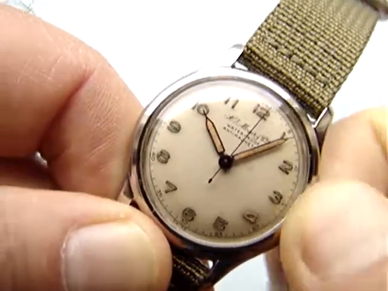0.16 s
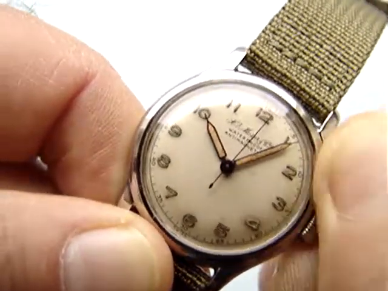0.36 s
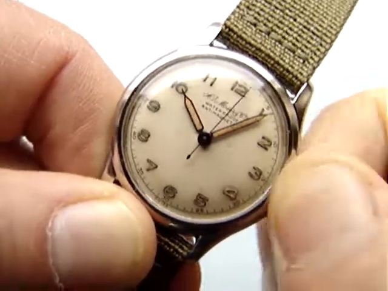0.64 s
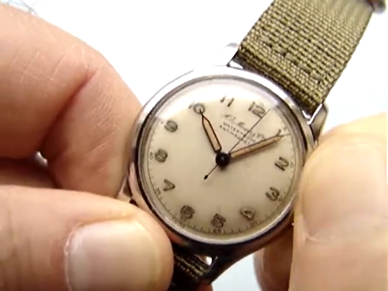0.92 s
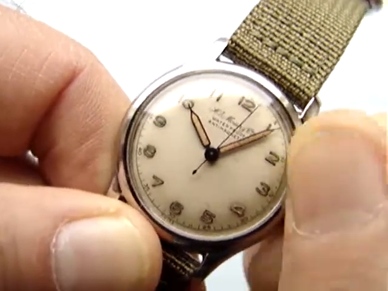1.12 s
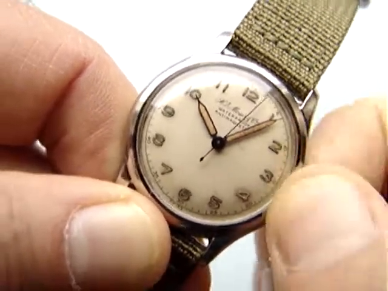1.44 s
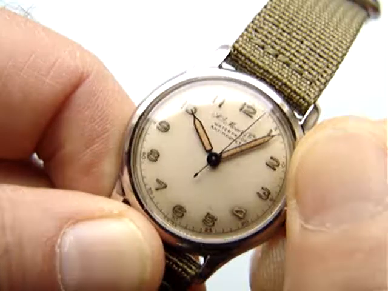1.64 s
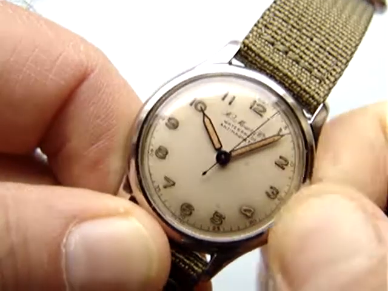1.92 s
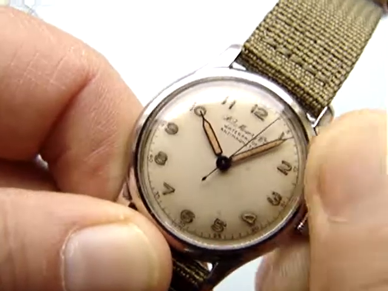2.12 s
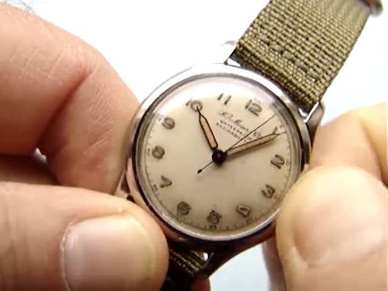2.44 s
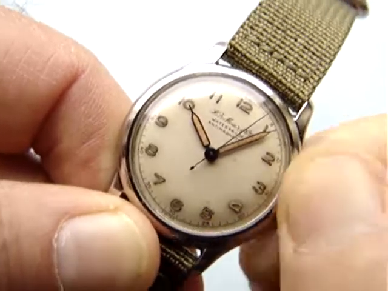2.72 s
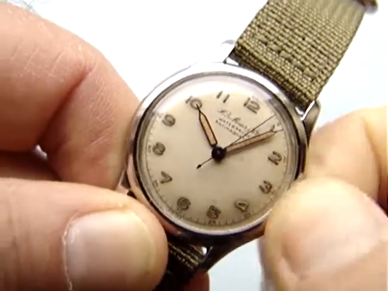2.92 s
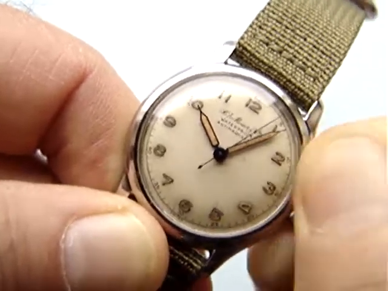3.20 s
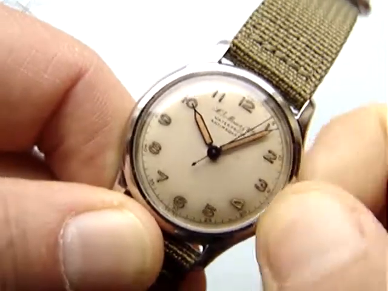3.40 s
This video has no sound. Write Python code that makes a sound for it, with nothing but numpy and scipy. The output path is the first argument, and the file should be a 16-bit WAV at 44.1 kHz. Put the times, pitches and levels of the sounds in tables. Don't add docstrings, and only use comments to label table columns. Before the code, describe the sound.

A wristwatch crown is wound back and forth by fingertips, giving short bursts of dry metallic ratchet clicks, alternating fuller and thinner, with skin rubs and soft bumps, close to a small microphone in a quietly hissing room.

```python
import sys
import numpy as np
from scipy import signal
from scipy.fft import rfft, irfft, next_fast_len
from scipy.io import wavfile

SR = 44100
rng = np.random.default_rng(int(sys.argv[2]) if len(sys.argv) > 2 else 0)


def to_wav(sig):
    pcm = np.clip(np.atleast_2d(sig), -1, 1) * 32767
    pcm = np.round(pcm).astype(np.int16)
    wavfile.write(sys.argv[1], SR, pcm.T)


def magnitude_from_level(level_db):
    exponent = np.asarray(level_db, float) / 20
    return 10 ** exponent


N = 156996
SLIDE_S, LEAD_S = 0.003, 0.0004
REBOUND_DB = -14


def unit(x):
    return x / np.sqrt(np.mean(x ** 2) + 1e-20)


def along(points, hz):
    f, db = np.transpose(points)
    return np.interp(np.log(hz + 1), np.log(f + 1), db, left=-120, right=-120)


def curves(rows):
    s, *columns = np.transpose(rows)
    return [np.interp(np.arange(N) / SR, s, column) for column in columns]


def noise(gain):
    m = next_fast_len(N)
    spectrum = rfft(rng.standard_normal(m)) * gain(np.fft.rfftfreq(m, 1 / SR))
    return unit(irfft(spectrum, m)[:N])


def coloured(points):
    return noise(lambda f: magnitude_from_level(along(points, f)))


def narrow(hz, width_hz):
    return noise(lambda f: 1 / (1 + (2 * (f - hz) / width_hz) ** 2))


def add(out, s, sound):
    out[round(s * SR):][:len(sound)] += sound


# (frequency [Hz], level [dB])
RUMBLE = [(26, -47), (50, -8.5), (78, -13), (100, -6), (154, -3.5), (273, -6), (595, -7), (660, -8.5),
          (1500, -13.5), (1950, -19), (3300, -120)]
# (frequency [Hz], width [Hz], level [dB])
DRONE = [(54.6, 9, -88), (131.7, 11, -73), (171, 16, -70), (225, 10, -73)]
# (time [s], level [dB])
SWELL = [
    (0, -2.5),
    (1.5, -3.5),
    (2.9, 1.5),
    (3.56, 6),
]


def room_hum():
    swell = magnitude_from_level(curves(SWELL)[0] + 0.3 * noise(lambda f: f < 8))
    rumble = magnitude_from_level(-60.5) * coloured(RUMBLE)
    hum = sum(magnitude_from_level(db) * narrow(hz, width) * swell for hz, width, db in DRONE)
    whine_hz = 6414
    whine = magnitude_from_level(-74.5) * np.sqrt(2) * np.sin(2 * np.pi * whine_hz * np.arange(N) / SR)
    return rumble + hum + whine


# (time [s], level [dB], pitch [Hz])
PASSING = [
    (1.75, -68, 261.5),
    (1.95, -62, 340.4),
    (2.2, -59.5, 422),
    (2.45, -62.5, 405),
    (2.75, -66.5, 331.4),
    (3.0, -101, 292),
]


def far_vehicle():
    db, hz = curves(PASSING)
    width_hz = 234
    turn = 2 * np.pi * np.cumsum(hz) / SR
    return magnitude_from_level(db) * (narrow(0, width_hz) * np.cos(turn) + narrow(0, width_hz) * np.sin(turn))


# (frequency [Hz], level [dB])
HISS = [(880, -27), (1500, -8), (2320, -2.5), (2420, -1), (2720, -4), (3510, -4.5), (3830, -5.5),
        (6210, -9), (10000, -7.5), (13000, -57), (22000, -120)]


def room_hiss():
    return magnitude_from_level(-61) * coloured(HISS)


def rubbing(strokes, colour):
    t = np.arange(N) / SR
    press = np.zeros(N)
    for s, length, db in strokes:
        arch = np.sin(np.pi * np.clip((t - s) / length, 0, 1))
        press += magnitude_from_level(db) * np.sqrt(np.clip(arch, 0, 1))
    grain = magnitude_from_level(2 * noise(lambda f: f < 300))
    return press * unit(grain * coloured(colour))


# (start [s], length [s], level [dB])
BURSTS = [
    (0, 0.027, -59.5),
    (0.394, 0.04, -55),
    (0.519, 0.031, -51.5),
    (1.215, 0.045, -58.5),
    (1.803, 0.057, -56),
    (2.299, 0.025, -52.5),
    (2.805, .04, -54),
    (3.162, 0.037, -60),
    (3.273, 0.043, -55),
    (0.685, 0.011, -64.5),
]
# (frequency [Hz], level [dB])
BURST_COLOUR = [(1800, -28), (2800, 0), (3600, -21.5), (6500, -18), (8800, -2.5), (10000, -10)]


def grainy_bursts():
    return rubbing(BURSTS, BURST_COLOUR)


def ring(modes, t):
    hz, db, t60 = np.transpose(modes)[..., None]
    louder, sharper, shifted = rng.standard_normal((3, len(modes), 1))
    sign = np.where(hz > 8000, 1, (-1.) ** np.arange(len(modes))[:, None])
    fade = magnitude_from_level(db + 1.5 * louder - 60 * t / t60)
    waves = sign * fade * np.sin(2 * np.pi * hz * (1 + 0.008 * sharper) * t + 0.35 * shifted)
    attack_s = 0.0002
    return waves.sum(axis=0) * (1 - np.exp(-(t / attack_s) ** 2))


# (frequency [Hz], level [dB], 60 dB fade [s])
CASE = [(2730, 0, .0095), (2930, -3, .008), (2300, -9.5, .008), (3230, -10, .007)]


def click(parts, case_db, rebound_db):
    t = np.arange(SR // 40) / SR - SLIDE_S
    rebound_s = 0.0021 * (1 + 0.05 * rng.standard_normal())
    now, later = np.maximum(t, 0), np.maximum(t - rebound_s, 0)
    scrape = magnitude_from_level(-20) * np.exp(t / 0.001)
    rattle_fade = magnitude_from_level(-18.5 - 60 * now / 0.01)
    shake = np.where(t < 0, scrape, rattle_fade)
    out = magnitude_from_level(case_db) * unit(ring(CASE, now))
    for steel, db in parts:
        blow = ring(steel, now)
        rattle = shake * unit(np.convolve(rng.standard_normal(len(t)), blow, "same"))
        rebound = magnitude_from_level(rebound_db) * ring(steel, later)
        out = out + magnitude_from_level(db) * unit(blow + rattle + rebound)
    return out


# (frequency [Hz], level [dB], 60 dB fade [s])
PAWL = [(8470, 0, 0.0036), (8770, 3, 0.0067), (9140, -6, 0.0066), (9200, 0, 0.0065), (10100, -8.5, 0.0076)]
STEM = [(5720, -17.5, 0.0035), (6387, -7.5, 0.0043), (6670, -13.5, 0.0089), (7190, -9, 0.0066),
        (8110, -9.5, 0.0045)]
# (time [s], case level [dB], steel level [dB])
TICKS = [(0.027, -69, -61.5), (0.2391, -60, -81), (0.41, -63, -63), (0.533, -51.5, -59.5),
         (0.907, -65, -73), (1.253, -64, -60), (1.534, -69, -74), (1.84, -62.5, -61.5), (2.038, -61.5, -67),
         (2.305, -74, -58), (2.326, -67, -54), (2.543, -60, -62), (2.831, -57.5, -58), (2.994, -67, -75),
         (3.295, -73, -59), (3.386, -63, -62)]


def slack_ticks():
    out = np.zeros(N + SR)
    for s, case_db, steel_db in TICKS:
        add(out, s - SLIDE_S, click([(STEM[1:] + PAWL, steel_db)], case_db, REBOUND_DB))
    return out[:N]


# (frequency [Hz], level [dB], 60 dB fade [s])
WHEEL = [(3636, -18, .007), (3940, -9.5, 0.01), (4213, -6, 0.0095), (4560, -7, 0.0096), (5154, -7, 0.0068),
         (5490, -15.5, 0.0045)]
# (time [s], pawl level [dB], then relative to it: stem [dB], wheel [dB], case [dB])
WINDING = [(0.059, -52.3, -4.8, -2.8, -2.6), (0.0757, -47.4, -9.8, -7.8, -7.6),
           (0.0935, -48.4, -4.9, -11.8, -5.9), (0.1151, -57.0, -1.3, 1.6, -4.6),
           (0.1524, -56.4, 1.4, 0.3, -2.1), (0.5744, -48.1, -5.7, -8.5, -4.8),
           (0.614, -49.3, -8.6, -10.0, -5.2), (0.644, -49.2, -9.5, -11.0, -13.1),
           (0.6753, -49.7, -5.0, -8.6, -2.2), (0.7587, -50.6, -6.1, -10.0, -7.4),
           (1.2862, -49.0, -9.9, -10.9, -10.7), (1.3043, -51.2, -8.5, -5.7, -1.7),
           (1.3279, -50.2, -9.1, -7.6, -3.3), (1.364, -52.4, -4.3, -2.1, -2.2),
           (1.4042, -51.5, 1.6, -5.7, -5.4), (1.8763, -48.3, -4.0, -9.5, -6.1),
           (1.8959, -50.3, -4.7, -7.0, -2.9), (1.9146, -49.2, -3.8, -7.8, -3.4),
           (1.9403, -50.2, -3.1, -5.2, -4.5), (2.36, -48.9, -4.9, -8.6, -1.6),
           (2.3809, -51.3, -5.1, -2.0, 0.3), (2.3997, -52.0, -2.4, -3.0, -3.0),
           (2.4195, -50.2, -2.4, -4.1, -3.4), (2.8555, -48.0, -9.6, -5.9, -1.6),
           (2.8686, -45.9, -7.2, -10.4, -9.5), (2.8821, -46.7, -6.4, -5.7, -8.6),
           (2.8979, -56.2, -0.2, 4.7, 4.0), (2.9204, -46.4, -8.9, -11.0, -14.3),
           (3.3379, -45.1, -7.7, -9.3, -7.6), (3.3744, -51.3, -1.9, -2.6, -1.0),
           (3.3948, -51.1, -5.4, -0.2, -0.3), (3.4103, -57.8, 1.3, 4.7, 1.0),
           (3.4243, -51.6, -4.9, -3.4, -1.2), (3.4447, -49.5, -7.6, -6.1, -3.5)]


def winding_clicks():
    out = np.zeros(N + SR)
    for s, db, stem_db, wheel_db, case_db in WINDING:
        parts = [(PAWL, db), (STEM, db + stem_db), (WHEEL, db + wheel_db)]
        add(out, s - LEAD_S - SLIDE_S, click(parts, db + case_db + 0.3, REBOUND_DB))
    return out[:N]


# (time [s], frequency [Hz], level [dB], 60 dB fade [s])
KNOCKS = [(.082, 733, -46.5, 0.093), (0.087, 1620, -46, 0.035), (.635, 1505, -37, 0.022),
          (1.737, 1540, -36.5, 0.018), (1.736, 950, -46, 0.02), (2.916, 728, -42.5, 0.11),
          (2.913, 1650, -53, 0.074), (2.927, 206, -40, 0.061), (3.15, 955, -43, 0.029),
          (3.149, 1830, -57, 0.055), (3.163, 1070, -43, 0.031)]


def finger_knocks():
    t = np.arange(SR // 5) / SR
    soft_start = 1 - np.exp(-t / 0.0011)
    out = np.zeros(N + SR)
    for s, hz, db, t60 in KNOCKS:
        pair = [(hz, db, t60), (hz * 1.05, db - 2.5, t60 / 2)]
        add(out, s, ring(pair, t) * soft_start)
    return out[:N]


# (frequency [Hz], level [dB], 60 dB fade [s])
SPRING = [(4780, -9.5, 0.0073), (5134, -9.5, 0.0071), (5790, -7.5, .006), (6670, -7, 0.0042),
          (7440, -1.5, 0.0065), (8520, 1.5, 0.0075), (8850, -6, 0.0085), (9180, -3, 0.0054),
          (8940, -10, 0.0072)]
# (time [s], peak level [dB], case relative to it [dB])
SKIPS = [(0.3142, -40.1, -18.3), (0.3305, -39.3, -16.0), (0.3468, -39.8, -17.9),
         (0.3632, -39.4, -14.7), (0.3792, -39.4, -24.0), (0.9912, -40.3, -13.8),
         (1.0134, -38.7, -27.3), (1.0349, -39.3, -20.3), (1.0556, -39.4, -22.0),
         (1.0772, -37.9, -17.5), (1.6047, -41.0, -14.3), (1.6205, -41.8, -12.3),
         (1.6341, -39.8, -21.5), (1.6493, -39.4, -19.7), (1.6681, -38.6, -19.3),
         (2.1091, -40.2, -17.2), (2.1258, -40.6, -8.3), (2.1416, -40.7, -15.1), (2.1556, -39.3, -17.0),
              (2.1691, -38.8, -22.7), (2.6075, -39.2, -19.0), (2.6236, -39.4, -10.5),
              (2.6423, -37.7, -28.3), (2.6682, -37.5, -23.3), (3.0666, -38.1, -27.9),
              (3.0809, -38.8, -27.2), (3.0981, -39.1, -19.1), (3.1147, -39.0, -20.5), (3.129, -38.4, -15.3),
              (3.1435, -37.9, -22.1), (3.159, -38.3, -15.4)]


def return_skips():
    out = np.zeros(N + SR)
    for s, db, case_db in SKIPS:
        sound = click([(SPRING, db - 8)], db + case_db - 9, rebound_db=-11)
        add(out, s - LEAD_S - SLIDE_S, sound)
    return out[:N]


# (time [s], level [dB])
SQUEAK = [
    (.835, -85),
    (.858, -58),
    (.87, -64),
    (.885, -59),
    (.92, -68),
    (.95, -90),
]


def skin_squeak():
    return magnitude_from_level(curves(SQUEAK)[0]) * narrow(hz=2830, width_hz=60)


# (start [s], length [s], level [dB])
RUSTLES = [
    (1.95, 0.53, -63.5),
    (3.143, 0.05, -53),
    (2.91, 0.033, -58.5),
]
# (frequency [Hz], level [dB])
RUSTLE_COLOUR = [(500, 0), (1000, -2), (2700, -1.5), (4000, -29)]


def strap_rustles():
    return rubbing(RUSTLES, RUSTLE_COLOUR)


def scene():
    watch = winding_clicks() + return_skips() + slack_ticks()
    hand = finger_knocks() + skin_squeak() + grainy_bursts() + strap_rustles()
    surroundings = room_hum() + far_vehicle() + room_hiss()
    return (watch + hand + surroundings)[None]


def round_treble(x):
    block_rate_hz, block, blocks, band = 32000, 128, 9, 4
    frame = block * blocks
    lead = 2 * frame - round(0.032 * block_rate_hz) + block // 2
    v = signal.resample_poly(x, block_rate_hz, SR)
    v = np.pad(v, (lead, 2 * frame - (len(v) + lead) % frame + block))

    n, k = np.arange(2 * block) + 0.5, np.arange(block) + 0.5
    hz = k * block_rate_hz / (2 * block)
    window = signal.windows.kaiser_bessel_derived(2 * block, 4 * np.pi)[:, None]
    basis = np.sqrt(2 / block) * window * np.cos(np.pi / block * np.outer(n + block / 2, k))
    hops = v.reshape(-1, block)
    c = np.hstack([hops[:-1], hops[1:]]) @ basis

    bands = c.reshape(-1, blocks, block // band, band)
    level = np.sqrt(np.mean(bands ** 2, axis=3)).max(axis=1)
    carried = np.maximum.accumulate(level * (hz[::band] > 3500), axis=1)
    level = np.maximum(magnitude_from_level(-7) * level, carried)
    level = level * magnitude_from_level(1.2 * rng.standard_normal(level.shape))
    step = magnitude_from_level(-5.5) * np.repeat(np.repeat(level, band, axis=1), blocks, axis=0) + 1e-12

    dead_zone = 0.12
    rounded = step * np.sign(c) * np.floor(abs(c) / step + 0.5 - dead_zone)
    c = np.where(hz > 2400, rounded, c) * (hz < 10000)
    halves = c @ basis.T
    v = (halves[1:, :block] + halves[:-1, block:]).ravel()[lead - block:]
    return signal.resample_poly(v, SR, block_rate_hz)[:N]


def top_cut(x):
    return signal.sosfilt(signal.butter(12, 10850, fs=SR, output="sos"), x)


def record(dry):
    heard = round_treble(dry[0])[None]
    mix = heard + magnitude_from_level(-97.5) * rng.standard_normal(N)
    return top_cut(mix)


dry = scene()
out = record(dry)
to_wav(out)
```